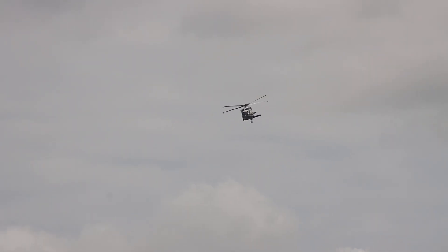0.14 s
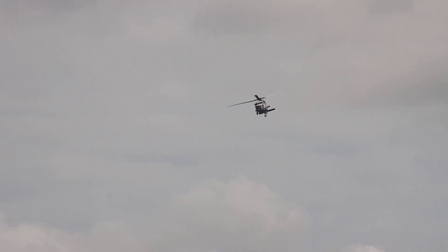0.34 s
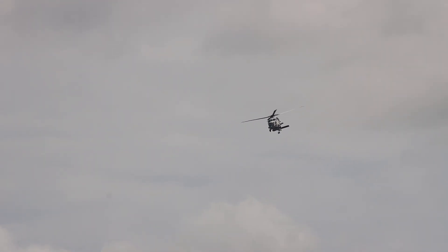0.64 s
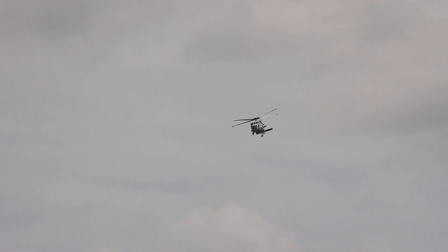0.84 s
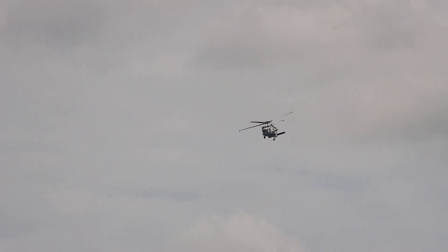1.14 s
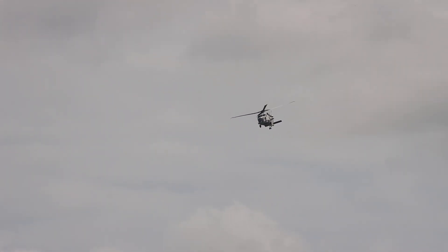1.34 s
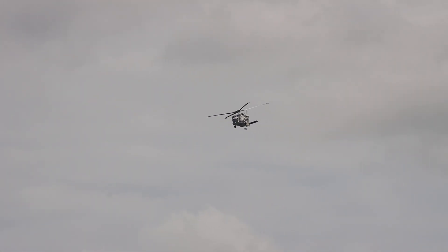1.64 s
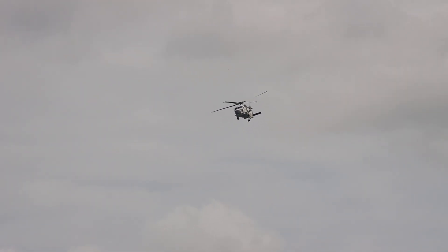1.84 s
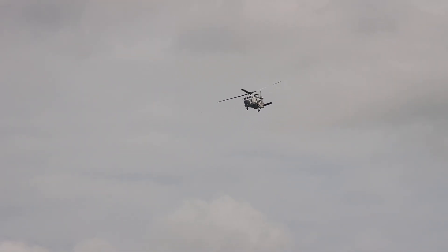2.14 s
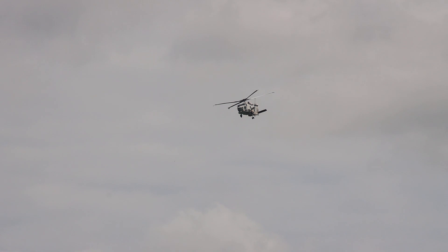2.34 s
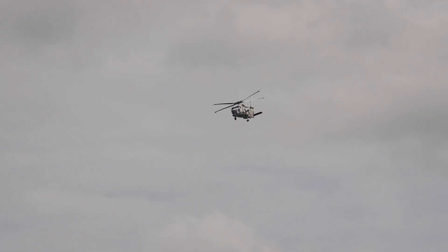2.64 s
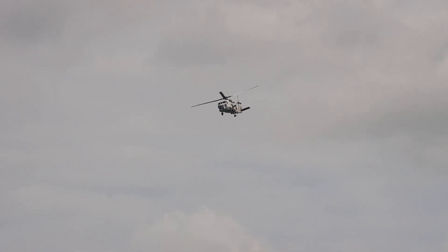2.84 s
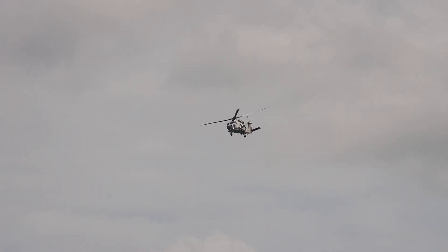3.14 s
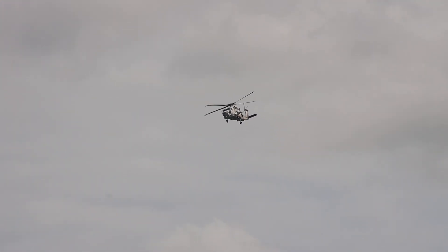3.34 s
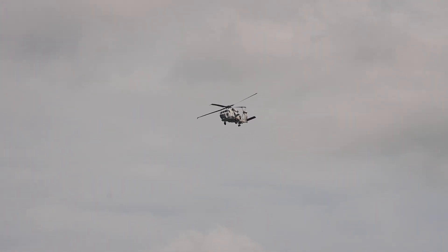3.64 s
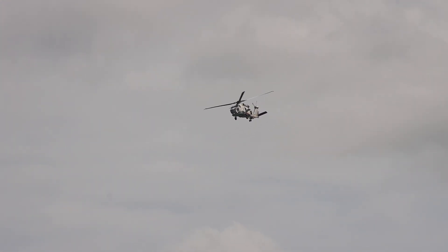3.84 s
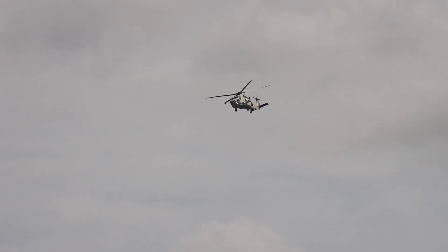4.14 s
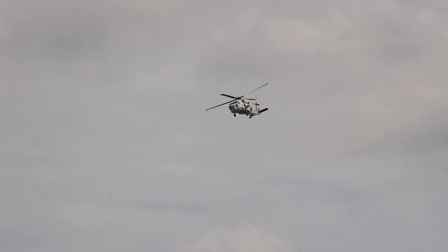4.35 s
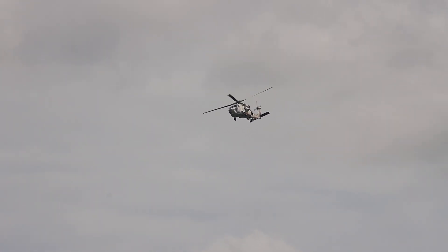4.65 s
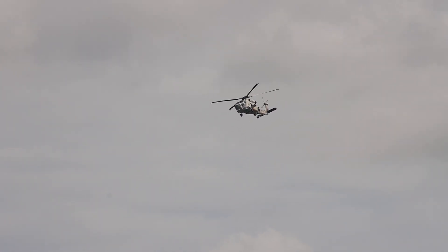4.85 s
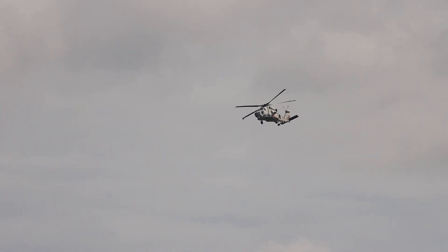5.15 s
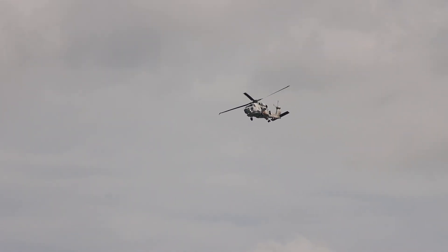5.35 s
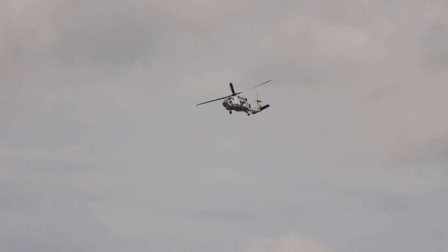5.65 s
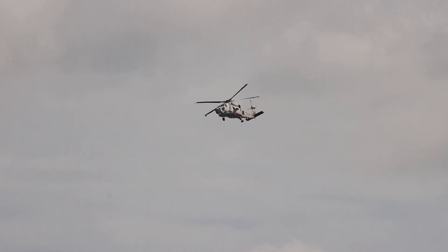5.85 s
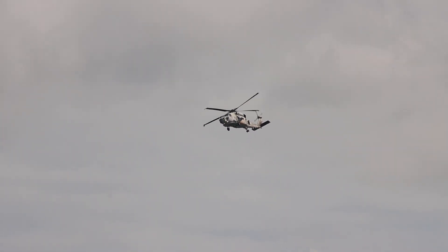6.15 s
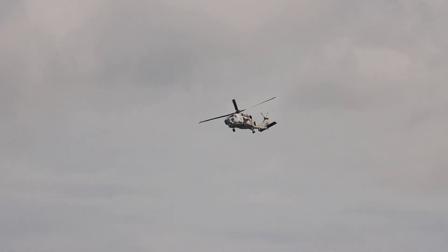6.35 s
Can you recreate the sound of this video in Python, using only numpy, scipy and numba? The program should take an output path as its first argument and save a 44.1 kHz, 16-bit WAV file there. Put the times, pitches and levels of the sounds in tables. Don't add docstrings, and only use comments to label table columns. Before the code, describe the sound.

Fast rhythmic helicopter blade chop and airy engine roar in the open, with wind thumps on the microphone briefly pushing the level down.

```python
import sys
import numpy as np
from scipy import signal
from scipy.fft import rfft, irfft, next_fast_len
from scipy.io import wavfile
from scipy.ndimage import uniform_filter1d
from numba import njit

SR = 44100
rng = np.random.default_rng(int(sys.argv[2]) if len(sys.argv) > 2 else 0)


def voltage_ratio(decibels):
    exponent = np.asarray(decibels, float) / 20
    return 10 ** exponent


def wav_out(sig):
    wavfile.write(sys.argv[1], SR, np.round(np.clip(np.atleast_2d(sig).T, -1, 1) * 32767).astype(np.int16))


N = 286650
TIME = np.arange(N) / SR
BINS = np.maximum(np.fft.rfftfreq(next_fast_len(N + 2, True), 1 / SR), 1)
SIDES = np.array([[1], [-1]])
BLADE_HZ = 19.05


def curves(table):
    s, *columns = np.transpose(table)
    return [np.interp(TIME, s, column) for column in columns]


def colour(table, hz):
    f, value = np.transpose(table)
    return np.interp(np.log(hz), np.log(f), value)


def unit(x):
    return x / np.sqrt(np.mean(x ** 2))


def delayed(x, ms):
    return np.interp(TIME - ms / 1000, TIME, x)


def noise(gain):
    return irfft(gain * np.exp(2j * np.pi * rng.random(len(gain))))[:N]


def band(low_hz, high_hz):
    centre_hz = np.sqrt(low_hz * high_hz)
    return np.exp(-np.log(BINS / centre_hz) ** 2 / np.log(high_hz / low_hz) ** 2 * 2)


def bells(s, length_s):
    return 2 ** -(2 * (TIME - s[:, None]) / length_s[:, None]) ** 2


def walk(rate):
    hold = int(SR / rate)
    steps = np.repeat(rng.standard_normal(N // hold + 1), hold)
    return 1.3 * uniform_filter1d(uniform_filter1d(steps, hold), hold)[:N]


@njit
def wavelets(s, hz, cycles, size, turn):
    out = np.zeros(N)
    for k in range(len(s)):
        spread = cycles[k] / hz[k] / 4
        first = max(0, int((s[k] - 4 * spread) * SR))
        last = min(N, int((s[k] + 4 * spread) * SR))
        for i in range(first, last):
            t = i / SR - s[k]
            bell = np.exp(-.5 * (t / spread) ** 2)
            out[i] += size[k] * bell * np.cos(2 * np.pi * (hz[k] * t + turn[k]))
    return out


# time in seconds, exhaust level in dB.
CARRY_DB = [(0.0, -37), (0.25, -38), (0.52, -37.5), (2.19, -42.5), (3.53, -42), (4.07, -42), (4.36, -42.5),
            (4.56, -41.5), (4.74, -40), (5.39, -38), (6.06, -37.5), (6.5, -36)]
# centre in seconds, length in seconds, gain in dB, Hz.
BEAMS = [(0.22, 0.22, 9.5, 190), (0.49, 0.22, 15, 192), (1.09, 0.53, 7.5, 190), (1.49, 0.84, 16.5, 1063),
         (1.7, 0.63, 14.5, 190), (1.63, 0.73, 6.5, 2030), (2.1, 0.69, 4, 340), (2.3, 0.56, 2.5, 8000),
         (2.86, 0.38, 9, 347), (2.97, 0.11, 12, 187), (4.03, 0.67, 5, 190), (3.9, 0.74, 11.5, 346),
         (3.82, 0.41, 7, 1900), (4.09, 0.42, 13, 1265), (4.574, 0.044, 3, 4500), (4.66, 0.6, 9.5, 1960),
         (5.33, 0.26, 13.5, 345), (5.95, 0.9, 7.5, 191), (6.2, 0.4, 6.5, 345), (1.77, 0.77, 18.5, 632),
         (2.76, 0.9, 11, 660), (3.94, 1.21, 15.5, 647), (4.67, 0.56, -4.5, 660), (4.96, 2.3, 4.5, 680),
         (5.24, 0.21, 3, 3000), (5.903, 2, 12, 648), (0.56, 0.84, -10, 2280), (0.77, 0.28, -4, 480),
         (4.296, 0.049, 7.5, 500), (2.902, 1.4, -7.5, 650), (3, 1.3, -6, 2800), (0.33, 0.48, 7.5, 310),
         (.85, .4, 5, 380), (1.35, .6, 5, 345), (4.98, 0.27, 7, 170), (5.52, .3, 3.5, 345),
         (5.2, .3, 4.5, 345), (6.6, 0.43, -3, 1900), (.1, .4, -2, 530), (5.15, 0.71, -1, 480),
         (0.82, 0.46, 1, 920), (4.66, 0.58, 3.5, 1370), (2.4, .7, 5, 2400), (4.86, .7, 5, 2560),
         (5.1, 1, 1.5, 8000), (3, .5, 0, 2500), (4.94, 0.65, -5, 190), (6.4, .2, 4.5, 190),
         (4.67, 0.47, 4.5, 1124), (5.1, 0.22, 4, 680), (0.27, 0.51, 3, 820), (5.98, 0.27, 5, 2140),
         (.5, 0.27, 5.5, 2740), (3.3, .5, -5, 1200)]


def heard(hz, db, share, db_per_s):
    s, length_s, gain_db, beam_hz = np.transpose(BEAMS)
    beam_width_octaves = 0.21
    reach = np.exp(-(np.log2(beam_hz / hz) / beam_width_octaves) ** 2)
    beams_db = gain_db * reach @ bells(s, length_s)
    carry_mid_db = -40
    carry_db = curves(CARRY_DB)[0] - carry_mid_db
    return db + share * carry_db + db_per_s * (TIME - TIME[-1] / 2) + beams_db


def passes(ms, hz, cycles, turn, late_ms, jitter_ms, scatter_db, wobble):
    start = np.arange(int(N / SR * BLADE_HZ) + 1) / BLADE_HZ
    jitter, scatter, tune = rng.standard_normal((len(start), 3)).T
    s = start + (np.interp(start, TIME, ms) + late_ms + jitter_ms * jitter) / 1000
    pitch_hz = np.interp(start, TIME, hz + 0 * TIME) * (1 + wobble * tune)
    one = np.ones(len(s))
    return unit(wavelets(s, pitch_hz, cycles * one, voltage_ratio(scatter_db * scatter), turn * one))


# time in seconds, Hz.
THUMP_HZ = [(0, 193), (2, 185), (4, 171), (5.2, 164), (5.8, 152.3), (6.5, 163)]


def thump(path_ms):
    ms = path_ms + 4.8 + .5 * np.maximum(TIME - 1, 0)
    beats = passes(ms, curves(THUMP_HZ)[0], 3.0, .3, late_ms=-2, jitter_ms=.15, scatter_db=1.1, wobble=.025)
    beats = beats + voltage_ratio(-12.5) * delayed(beats, 10.17)
    return voltage_ratio(heard(188, db=-36.5, share=0.43, db_per_s=0.65)) * unit(beats)


def knock(path_ms):
    knock_db = heard(339, db=-43.5, share=-1.7, db_per_s=-0.1)
    rap_db = heard(665, db=-50, share=0.9, db_per_s=0)
    beats = passes(path_ms, 345., 2.7, .1, late_ms=-.5, jitter_ms=.2, scatter_db=1, wobble=.035)
    rap = passes(path_ms, 650., 3.2, .1, late_ms=-2.2, jitter_ms=.5, scatter_db=.9, wobble=.07)
    beats = beats + voltage_ratio(rap_db - knock_db) * rap
    beats = beats + voltage_ratio(-10) * delayed(beats, 5.65)
    return voltage_ratio(knock_db + 3.0) * unit(beats)


# time in seconds, crack Hz, snap Hz.
BRIGHT_HZ = [(0, 1250, 1920), (1.2, 1095, 1900), (2, 1160, 1900), (3.9, 1210, 1950), (4.5, 1390, 2150),
             (5.1, 1370, 2320), (5.5, 1210, 2200), (6.5, 1240, 2000)]


def crack_and_snap(path_ms):
    ms = path_ms - 1.5 + .95 * TIME
    snap_late_ms = 3
    crack_hz, snap_hz = curves(BRIGHT_HZ)
    crack_db = heard(1126, db=-44, share=0.65, db_per_s=1.5)
    snap_db = heard(2003, db=-43, share=1.95, db_per_s=-0.5)
    fizz_db = heard(2501, db=-56.5, share=1.5, db_per_s=0)
    gate = passes(ms, 30., .55, 0, late_ms=.5, jitter_ms=.5, scatter_db=.6, wobble=.1)
    late = passes(ms, 24., .55, 0, late_ms=snap_late_ms, jitter_ms=.7, scatter_db=1, wobble=.1)

    def stereo_hiss(low_hz, high_hz):
        mid, side = (unit(noise(band(low_hz, high_hz))) for _ in range(2))
        return gate * (mid * (1 - .12 * SIDES) + .25 * side * SIDES)

    crack = stereo_hiss(1000, 1560)
    snap = stereo_hiss(1700, 2260) * late / np.maximum(gate, .3)
    snap = snap + voltage_ratio(fizz_db - snap_db + 8) * late * unit(noise(band(2450, 3400)))
    crack_tone = passes(ms, crack_hz, 6.5, .1, late_ms=-1, jitter_ms=.4, scatter_db=.7, wobble=.04)
    snap_tone = passes(ms, snap_hz, 11, .1, late_ms=snap_late_ms - 1, jitter_ms=.7, scatter_db=.7, wobble=.05)
    crack = .6 * crack + 1.3 * crack_tone
    snap = .6 * snap + .85 * snap_tone
    return voltage_ratio(crack_db - 9.0) * crack + voltage_ratio(snap_db - 9.5) * snap


# Hz, dB per Hz.
LOW_COLOUR_DB = [(35, -49), (60, -21), (143, -15), (193, -0.5), (252, -7.5), (329, -2.5), (489, -14),
                 (681, -9.5), (978, -18.5), (1260, -19.5), (1700, -23.5), (2330, -24.5), (2600, -27.5),
                 (3380, -60), (5720, -120)]
HIGH_COLOUR_DB = [(1530, -29), (2600, -6.5), (3110, -13.5), (3400, -13.5), (3950, -3), (5020, -4.5),
                  (5920, -12.5), (8410, -20), (9620, -27), (13100, -28), (14000, -37), (15500, -46)]
# Hz, likeness from 0 to 1.
ALIKE = [(60, 1), (130, 0.4), (290, 0.49), (640, 0.37), (1410, 0.48), (3100, 0.4), (6820, 0), (15000, 0)]
# Hz, left minus right in dB.
LEAN_DB = [(60, -6), (110, 3), (200, 0), (380, 0.5), (700, -0.5), (1290, -1), (2380, -5), (4400, 5.5),
           (8120, -3.5), (15000, -15)]


def roar(throb):
    levels_db = [heard(480, db=-30.5, share=1.16, db_per_s=0.11) - 1.2,
                 heard(1496, db=-39, share=1.5, db_per_s=0.12) - 0.17,
                 heard(2996, db=-49, share=1.28, db_per_s=0.5) - 0.8,
                 heard(4497, db=-47, share=0.2, db_per_s=0.42) + 1.23,
                 heard(8011, db=-57, share=0.18, db_per_s=-0.12) + 2.5]
    low_db = colour(LOW_COLOUR_DB, BINS) - LOW_COLOUR_DB[-3][1]
    high_db = colour(HIGH_COLOUR_DB, BINS) - HIGH_COLOUR_DB[1][1]
    shape = voltage_ratio(np.where(BINS < 2600, low_db, high_db))
    alike = np.clip(colour(ALIKE, BINS) + 0.42 * (BINS < 900), -.9, .995)
    layers, swell = np.zeros((5, 2, N)), walk(1.5)
    for hz in 70 * 2 ** np.arange(0, 6.6, .36):
        octaves = np.log2(BINS / hz)
        if hz >= 6000:
            octaves = np.minimum(octaves, 0)
        slot = shape * np.sqrt(np.clip(1 - np.abs(octaves) / .36, 0, 1))
        pair = noise(slot * np.sqrt(1 + alike)) + SIDES * noise(slot * np.sqrt(1 - alike))
        low = np.clip(np.log(6000 / hz) / 3.5, 0, 1)
        flicker_db = low * (.8 * swell + 1.5 * walk(5)) + (.8 + .5 * low) * walk(14)
        chop = 0.26 * np.exp(-np.log(hz / 800) ** 2 / 1.83)
        lean_db = colour(LEAN_DB, hz) * SIDES / 2
        layer = np.searchsorted([900, 2500, 3500, 6000], hz)
        layers[layer] += voltage_ratio(flicker_db + lean_db) * (1 + chop * throb) * pair
    return sum(voltage_ratio(db) * unit(layer) for db, layer in zip(levels_db, layers))


# time in seconds, delay in ms.
PATH_MS = [(0, 24.5), (1.4, 24.8), (2, 27.5), (2.6, 30.5), (3.9, 31), (4.3, 30), (4.7, 27.3), (5.3, 23.5),
           (6.5, 22.8)]


def helicopter():
    path_ms = curves(PATH_MS)[0]
    throb = passes(path_ms, 12., .45, 0, late_ms=3, jitter_ms=1, scatter_db=1, wobble=.1)
    return thump(path_ms) + knock(path_ms) + crack_and_snap(path_ms) + roar(throb)


def field(x):
    middle = signal.sosfiltfilt(signal.butter(2, [600, 2300], "bandpass", fs=SR, output="sos"), x)
    echo_ms = 1.564 + 0.093 * walk(1.4)
    return x + voltage_ratio(-17) * np.array([delayed(port, echo_ms) for port in middle])


# Hz, left lead in radians.
TWIST_RAD = [(300, -0.19), (1000, -0.22), (1700, -0.78), (2500, 0.42), (3500, -0.25), (5000, -0.1)]


def ports_hear(x):
    size = 2 * (len(BINS) - 1)
    turn = np.exp(.5j * colour(TWIST_RAD, BINS) * SIDES)
    return irfft(rfft(x, size) * turn, size)[:, :N]


# centre in seconds, length in seconds, level in dB, left minus right in dB.
GUSTS = [(0.196, 0.2, -29.5, -10), (0.446, 0.18, -22, -1.5), (0.612, 0.069, -26, 11),
         (0.982, 0.17, -28, 17.5), (1.232, 0.19, -24, 6.5), (1.4, 0.12, -24.5, 8), (1.714, 0.22, -21.5, 4),
         (1.84, 0.094, -24.5, -10), (2.035, 0.13, -20, 8), (2.27, 0.064, -30.5, -1),
         (2.438, 0.11, -17.5, 1), (2.586, 0.12, -19, 0), (2.876, 0.34, -29, -2), (3.05, 0.061, -22, 6),
         (3.272, 0.26, -28, -8), (3.464, 0.039, -20.5, 9), (3.643, 0.086, -27.5, -2),
         (3.952, 0.57, -34, 23.5), (4.162, 0.07, -20.5, 10), (4.225, 0.035, -14, -12),
         (4.289, 0.033, -11.5, 6), (4.354, 0.12, -27.5, 12), (4.735, 0.23, -25.5, 19.5),
         (5.163, 0.046, -24, -7), (5.614, 0.12, -38, 15), (6.15, 0.047, -41, -23),
         (6.396, 0.063, -25.5, -4)]


def gusts():
    s, length_s, db, pan_db = np.transpose(GUSTS)
    calm_db, rumble_db = -53, -15.5
    left, right = (voltage_ratio(calm_db) + voltage_ratio(db + side * pan_db) @ bells(s, length_s) for side in (.5, -.5))
    breeze = voltage_ratio(-52.5 + 19.5 * (TIME - 4.96))
    return 20 * np.log10([left, right, voltage_ratio(rumble_db) * (left + right) / 2 + breeze])


def eddies(db, rate, hz, cycles, tail_db, brighten):
    place, size, tune, turn = rng.random((int(rate * N / SR), 4)).T
    s = place * N / SR
    pitch_hz = hz * np.exp(1.07 * (tune - .5)) * voltage_ratio(brighten * (np.interp(s, TIME, db) + 47.0))
    rarest = .04
    burst = voltage_ratio(-tail_db * np.log(np.maximum(size, rarest)))
    return voltage_ratio(db) * unit(wavelets(s, pitch_hz, cycles + 0 * s, burst, turn))


# time in seconds, peak in dB, Hz, port (0 left, 1 right).
POPS = [(0.412, -5, 229, 1), (1.2408, -5, 350, 0), (1.7132, -1.5, 310, 0), (1.7848, 0.5, 238, 1),
        (2.243, -2.5, 342, 1), (2.405, -2.5, 228, 1), (2.434, -7, 271, 1), (2.4611, 3, 340, 0),
        (2.485, -5, 406, 0), (2.569, -7, 277, 1), (2.5783, -3.5, 286, 1), (3.0376, 6, 544, 1),
        (3.0537, -0.5, 260.0, 1), (3.0631, -0.5, 440, 1), (3.458, -1.5, 390, 1), (3.468, -3.5, 400, 1),
        (3.059, 1, 330, 1), (4.1472, -4, 332, 0), (4.1526, -2.5, 473, 0), (4.212, 4.5, 430, 1),
        (4.2204, 0.5, 320, 1), (4.2507, 8, 342, 1), (4.2708, 1, 292, 1), (4.2782, -6, 330, 0),
        (4.2872, 1, 345, 1), (4.2978, -5, 328, 1), (4.3055, 4.5, 334, 1), (4.283, -3, 330, 1),
        (4.36, -4, 268, 1), (4.402, -4, 510, 1), (6.136, 3, 242, 1), (0.4644, -14, 200, 1),
        (3.034, -6, 300, 1), (0.5193, -12, 306, 0), (0.6264, -7.5, 328, 1), (4.2911, -4, 290, 1),
        (2.476, -9, 375, 1), (2.5001, -2, 230, 0), (2.5452, -7.5, 340, 0), (2.6575, -10, 380, 0),
        (3.2119, -10, 408, 0), (3.2845, -6.5, 348, 1), (4.1316, -5, 242, 0), (4.1793, -4.5, 314, 1),
        (4.334, -10, 284, 0), (4.6583, -6.5, 360, 0), (4.715, -3.5, 331, 0), (4.7214, -8, 330, 0),
        (4.3005, 1.5, 400, 1), (4.7953, -3, 278, 1)]


def pops():
    s, db, hz, port = np.transpose(POPS)
    turn = 0.57 + .07 * rng.standard_normal(len(s))
    cycles = 1.67 * voltage_ratio(-.07 * (db + 7.0))

    def struck(side):
        pulse = wavelets(s, hz, cycles, voltage_ratio(db - 6.0) * side, turn)
        return pulse + wavelets(s + 0.0011, 2.04 * hz, 2.16 + 0 * s, voltage_ratio(db - 21.0) * side, turn)

    return np.array([struck(port < .5), struck(port >= .5)])


def wind():
    left_db, right_db, rumble_db = gusts()
    both_db = (left_db, right_db)
    buffets = np.array([eddies(db - 8.5, 160, 259.0, 2.47, 3.0, 0.041) for db in both_db])
    grit = np.array([eddies(db - 22.5, 120, 620., 2.2, 1.8, .02) for db in both_db])
    shove = eddies((left_db + right_db) / 2 - 7.5, 120, 200, 3.66, 2.0, 0.042)
    shared, apart = (eddies(rumble_db - 2, 260, 115., 1.3, 1, .05) for _ in range(2))
    hits = buffets + pops()
    return grit + hits + 0.11 * hits[::-1] + shove + shared + 0.42 * apart * SIDES


# time in seconds, peak in dB, left minus right in dB.
TICKS = [
    (2.0462, -43, -2.5),
    (2.7132, -45, 2.5),
]


def ticks():
    s, db, pan_db = np.transpose(TICKS)
    return np.array([wavelets(s, 11000. + 0 * s, 2.2 + 0 * s, voltage_ratio(db + 2.5 + side * pan_db), 0 * s)
                     for side in (.5, -.5)])


# time in seconds, Hz, level in dB.
WHOOSH = [
    (5.42, 3405, -57),
    (5.52, 3276, -47),
    (5.66, 2985, -39.5),
    (5.76, 2770, -46),
    (5.84, 2745, -53),
]


def whoosh():
    hz, db = curves(WHOOSH)
    phase = 2 * np.pi * np.cumsum(hz) / SR
    width_hz = 470
    slow = [unit(noise(np.exp(-(BINS / width_hz) ** 2))) for _ in range(2)]
    return voltage_ratio(db) * (slow[0] * np.cos(phase) + slow[1] * np.sin(phase))


def scene():
    far = ports_hear(field(helicopter()))
    return far + wind() + ticks() + ports_hear(whoosh())


@njit
def follow(x, attack, release):
    y, e = np.empty(len(x)), 0.
    for i in range(len(x)):
        e += (x[i] - e) * (attack if x[i] > e else release)
        y[i] = e
    return y


# centre in seconds, length in seconds, gate in dB over mean.
THINNED = [(.16, .06, 3), (.45, .04, 2), (.63, .06, 3), (.96, .06, 3), (1.22, .07, 2), (1.54, .05, 2),
           (2.02, .03, 2), (2.09, .04, 2), (2.42, .08, 1), (2.86, .04, 1), (3.07, .025, 12), (3.49, .06, 2),
           (3.66, .04, 3), (4.03, .04, 2), (4.18, .06, 3), (4.285, .08, 4.5), (4.38, .04, 2),
           (4.67, .04, 3), (4.79, .06, 3), (5.53, .03, 1), (5.62, .03, 2), (5.72, .07, 3), (5.83, .06, 4),
           (6.0, .04, 2), (6.14, .05, 5), (6.41, .03, 2)]


def thin_top(x):
    lead, thin_hz, top_hz = 804, 9000, 13900
    sums = np.pad(np.array([x[0] + x[1], x[0] - x[1]]) / 2, ((0, 0), (lead, 0)))
    hz, s, lines = signal.stft(sums, SR, "cosine", nperseg=2048)
    at, length_s, gate_db = np.transpose(THINNED)
    gate = np.interp(s - lead / SR, TIME, .8 * voltage_ratio(gate_db) @ bells(at, length_s))
    gate = gate + .62 * rng.random(len(s)) ** 2
    power = uniform_filter1d(np.abs(lines) ** 2, size=3, axis=1)
    top = (hz > thin_hz)[:, None]
    wander = uniform_filter1d(rng.standard_normal(len(s)), size=2) * 1.4
    edge_hz = np.maximum(top_hz + 1300 + 700 * wander - 900 * gate, top_hz)
    strong = power > gate ** 2 * power.mean(axis=-1, keepdims=True)
    keep = (strong | ~top) & (hz[:, None] < edge_hz)
    lost = np.sum(power * top, axis=1) / (np.sum(power * keep * top, axis=1) + 1e-18)
    refill = np.where(top, np.minimum(lost, 4)[:, None] ** .5, 1)
    mid, side = signal.istft(lines * keep * refill, SR, "cosine", nperseg=2048)[1][:, lead:lead + N]
    return mid + side * SIDES


def band_limit(x):
    return signal.sosfilt(signal.butter(12, 15680, fs=SR, output="sos"), x)


def record(dry):
    x = signal.sosfilt(signal.butter(3, 70, "highpass", fs=SR, output="sos"), dry)
    duck_above, release_s = 0.46, 0.73
    peak = follow(np.abs(x).max(axis=0), .01, 1 / (release_s * SR))
    x = x * np.minimum(1, duck_above / (peak + 1e-9))
    x = x / (1 + x ** 10) ** (1 / 10)
    x = signal.sosfilt(signal.butter(8, 16500, fs=SR, output="sos"), x)
    mix = thin_top(x)
    return band_limit(mix)


dry = scene()
out = record(dry)
wav_out(out)
```